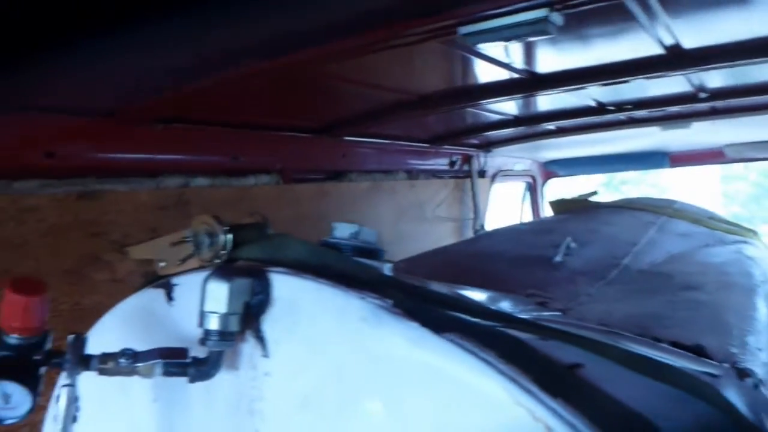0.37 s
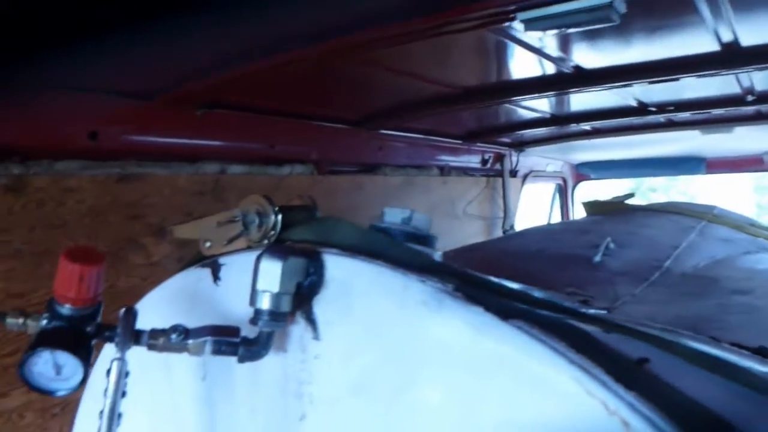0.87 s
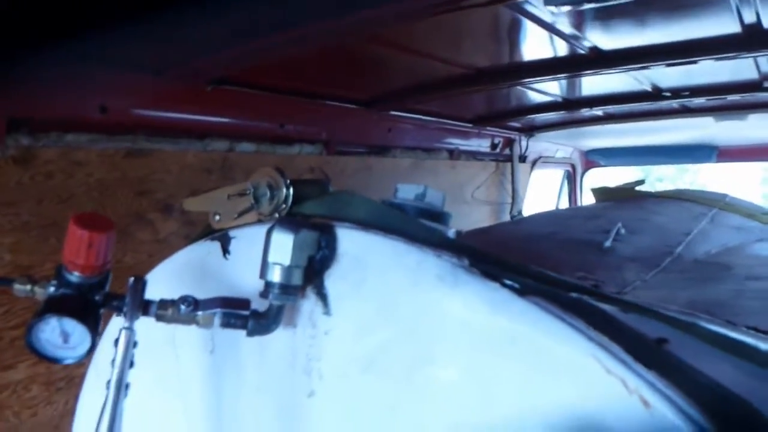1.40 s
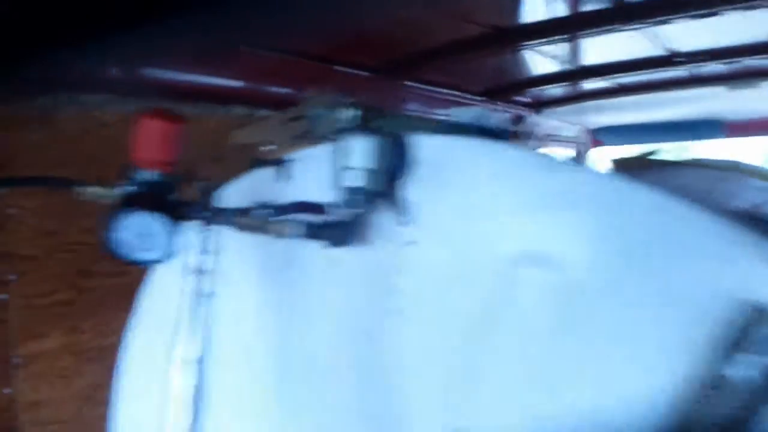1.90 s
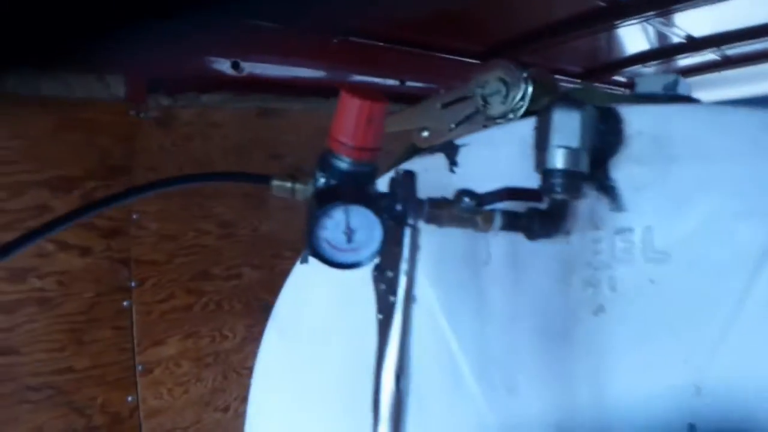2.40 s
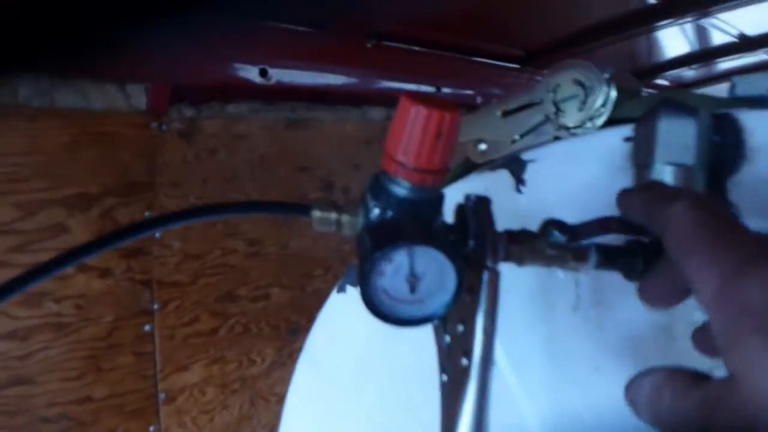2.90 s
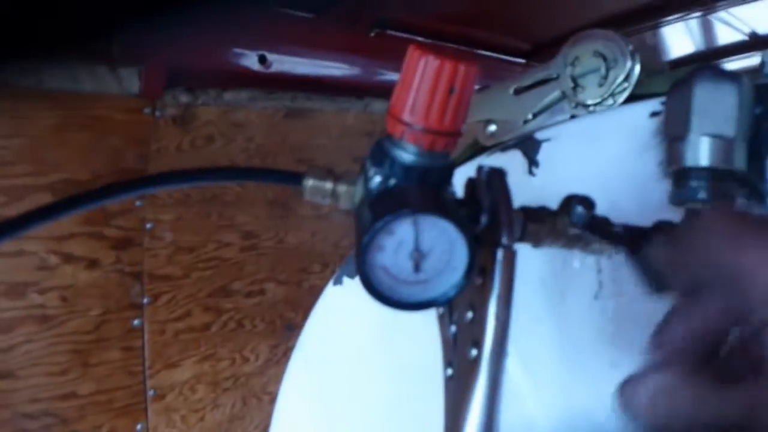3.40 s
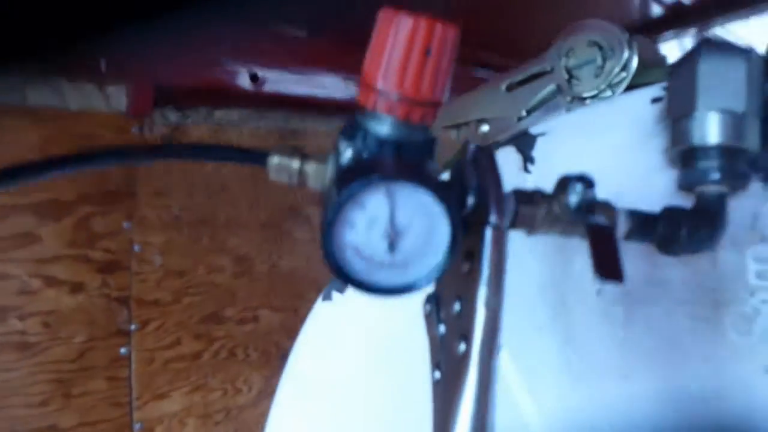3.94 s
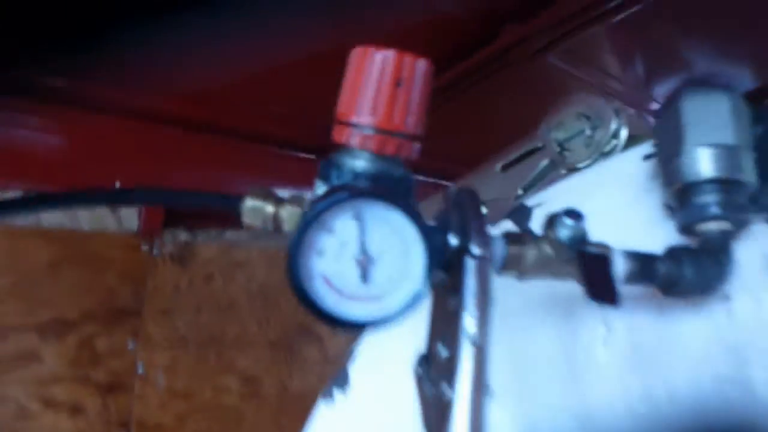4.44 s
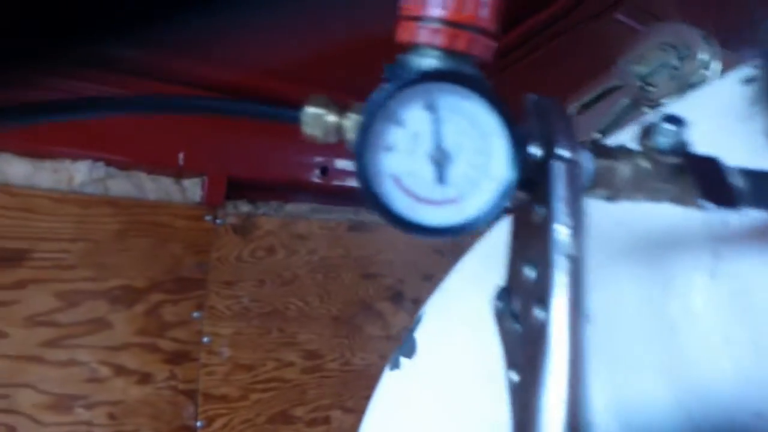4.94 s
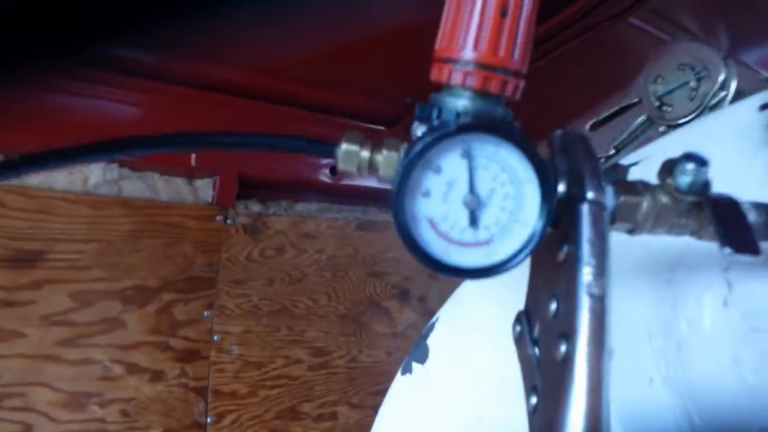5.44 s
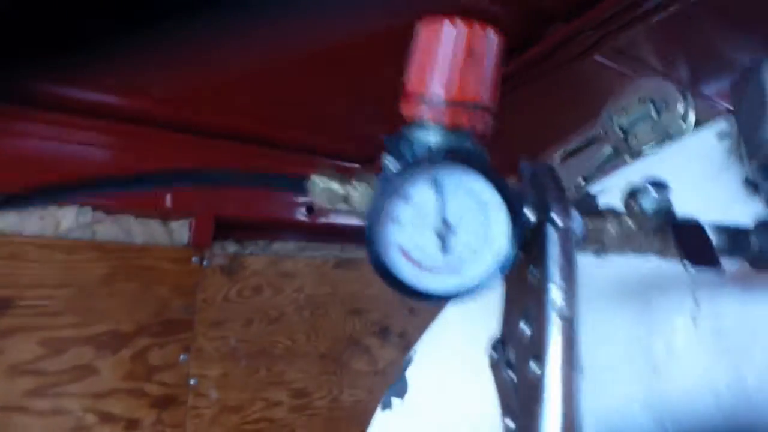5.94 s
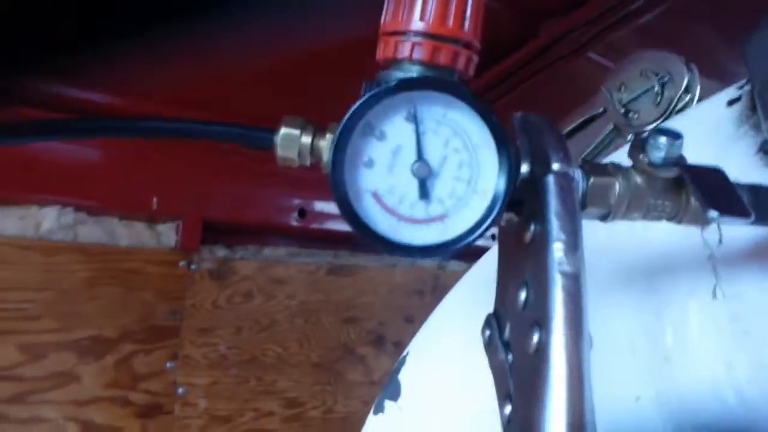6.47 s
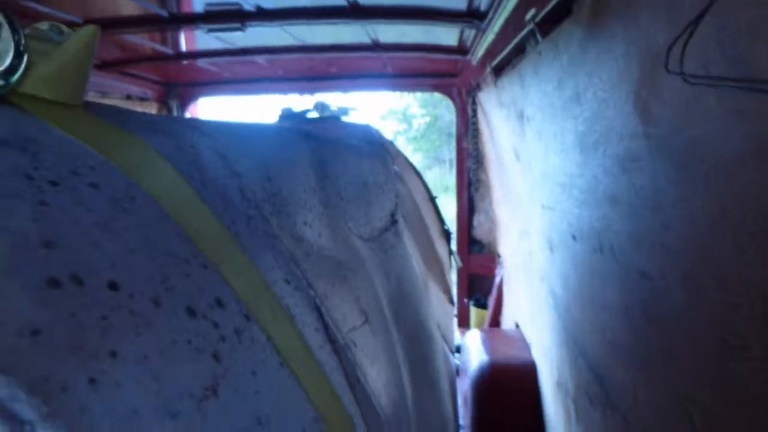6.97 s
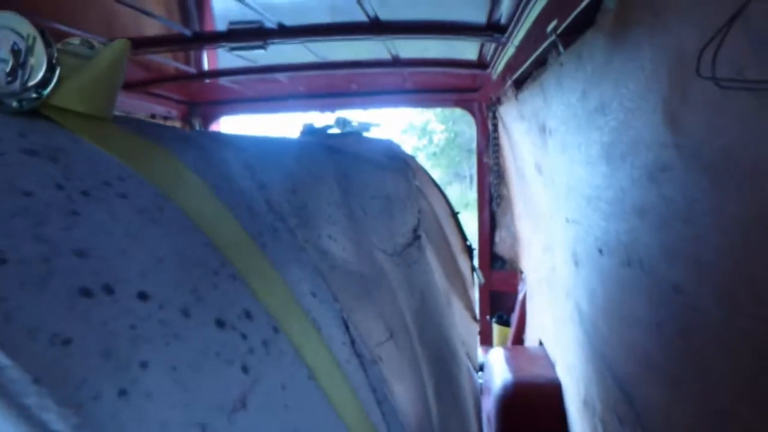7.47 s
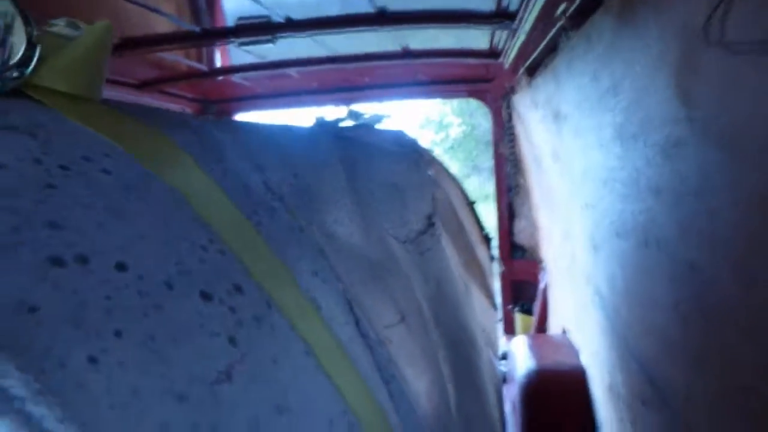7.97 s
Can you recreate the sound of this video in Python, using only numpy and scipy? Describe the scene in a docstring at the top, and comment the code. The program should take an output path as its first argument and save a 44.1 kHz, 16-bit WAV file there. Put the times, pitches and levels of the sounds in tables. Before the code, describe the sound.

Loud air flow hums inside a big metal tank, then drops to a sharp whistling leak; a dull knock rings, and after a brief gap something creaks twice.

```python
"""Compressed air hisses through a regulator and a ball valve into a large tank in the back of a van.
The valve shuts, the tank falls quiet and air escapes at the regulator with a brighter hiss; something knocks the tank.
After a short silent pause the same leak is heard from further off while a strap or panel creaks twice.
Flow sounds are flickering noise shaped by resonances and broad spectra; blows, slips and snaps ring damped modes."""
import sys
import numpy as np
from scipy import signal
from scipy.fft import irfft
from scipy.io import wavfile
from scipy.ndimage import uniform_filter1d, map_coordinates

SR = 44100
rng = np.random.default_rng(int(sys.argv[2]) if len(sys.argv) > 2 else 0)


def decibels_to_gain(level_db):
    """Convert a level in decibels to a linear amplitude gain (20 dB per decade)."""
    exponent = np.asarray(level_db, float) / 20
    return 10 ** exponent


def dump(signal):
    """Clip the signal to [-1, 1] and save it as 16-bit WAV at the path in sys.argv[1]."""
    limited = np.clip(np.atleast_2d(signal).T, -1, 1)
    pcm = np.round(limited * 32767).astype(np.int16)
    wavfile.write(sys.argv[1], SR, pcm)


N = 357210
T = np.arange(N) / SR
HZ = np.maximum(np.arange(N // 2 + 1) * SR / N, 1)

VALVE_SHUTS_S = 3.58
PAUSE_START_S, PAUSE_END_S = 6.598, 6.827   # silence between the near and the far listening place


def rms_one(x):
    """Normalisation: scales a signal to unit rms."""
    return x / np.sqrt(np.mean(x ** 2) + 1e-20)


def in_time(table):
    """Linear interpolation: reads a table of (t/s, value) at every sample."""
    seconds, values = np.transpose(table)
    return np.interp(T, seconds, values)


def at_hz(points, hz):
    """Logarithmic frequency axis: reads a spectrum table of (f/Hz, value) at given frequencies."""
    table_hz, values = np.transpose(points)
    return np.interp(np.log(hz), np.log(table_hz), values)


def drift(rate_hz):
    """Low-passed random process: two equal poles at rate_hz give a slow fluctuation of spread 1."""
    step = 40   # samples between computed points
    settle = 2000   # points dropped while the filter settles
    r = np.exp(-2 * np.pi * rate_hz * step / SR)
    noise = rng.standard_normal(N // step + settle + 2)
    slow = signal.lfilter([1], [1, -2 * r, r * r], noise)[settle:]
    return np.interp(np.arange(N) / step, np.arange(len(slow)), rms_one(slow))


def peaks(table):
    """Resonance: power response of modes driven by noise, each with its half-power width."""
    power = 0
    for hz, width_hz, level_db in table:
        detuning = (HZ ** 2 - hz ** 2) / (HZ * max(width_hz, 3))
        power = power + decibels_to_gain(2 * level_db) / (1 + detuning ** 2)
    return power


def broad(points):
    """Broadband spectral density: a power spectrum that dies away beyond the table's ends."""
    return decibels_to_gain(2 * at_hz([(1, -120)] + list(points) + [(SR, -60)], HZ))


# Correlation of the two channels: f/Hz, left-right likeness (0-1)
CHANNEL_LIKENESS = [(60, 0.4), (180, 0.82), (540, 0.87), (1610, 0.86), (4800, 1), (14400, 0.94)]
# Channel balance: f/Hz, left over right level/dB
CHANNEL_BALANCE = [(60, -3), (240, -3.5), (930, 0), (3650, 1), (14400, -0.5)]


def turbulence(power, low_hz, high_hz, flicker_db):
    """Turbulent flow noise: random spectrum of given power, partly coherent in stereo, of fluctuating level."""
    shape = (2, len(HZ))
    mid, side = np.sqrt(power) * (rng.standard_normal(shape) + 1j * rng.standard_normal(shape))
    alike = np.clip(at_hz(CHANNEL_LIKENESS, HZ), 0, 1)
    left = decibels_to_gain(at_hz(CHANNEL_BALANCE, HZ) / 2)
    mid = np.sqrt(1 + alike) * mid
    side = np.sqrt(1 - alike) * side
    # level is set by the mid signal between the two frequencies, before the flicker
    band = (HZ > low_hz) & (HZ < high_hz)
    scale = N / np.sqrt(2 * np.sum(np.abs(mid[band]) ** 2))
    both = irfft(np.array([(mid + side) * left, (mid - side) / left]), N) * scale
    return both * decibels_to_gain(flicker_db * (drift(5) / 3 + drift(34)))


def ring(events, modes, spread_db):
    """Modal impulse response: each blow excites every damped mode with a random strength of its own."""
    out = np.zeros(N)
    seconds, event_db = np.transpose(events)
    at = (seconds * SR).astype(int)
    luck = rng.standard_normal((len(at), len(modes)))
    for k, (hz, level_db, t60_s) in enumerate(modes):
        clicks = np.full(N, 1e-18)
        clicks[at] = decibels_to_gain(event_db + level_db + spread_db * luck[:, k])
        r = decibels_to_gain(-60 / (max(t60_s, .002) * SR))
        w = 2 * np.pi * hz / SR
        sense = (-1) ** k   # neighbouring modes swing in opposite sense
        out += sense * signal.lfilter([0, np.sin(w)], [1, -2 * r * np.cos(w), r * r], clicks)
    return out


def stroke(start, attack, hold, release, db):
    """Envelope of friction (times in s): a gain that swells, holds and dies away on squared ramps."""
    up = (T - start) / max(attack, .002)
    down = (start + attack + hold + release - T) / max(release, .002)
    return decibels_to_gain(db) * np.clip(np.minimum(up, down), 0, 1) ** 2


def delayed(x, ms):
    """Propagation delay: reads both channels a changing time late, between samples."""
    return np.array([map_coordinates(side, [np.arange(N) - ms * SR / 1000], order=3) for side in x])


# Air resonances of the tank: f/Hz, width/Hz, level/dB
TANK_AIR_MODES = [(304.8, 7.2, -6.5), (645.6, 13, -7), (666, 9.1, -11), (794, 15, -8.5), (876, 17, -6),
                  (938, 17.5, -1), (988.3, 15, 3), (1043, 16, -7), (1075, 15.4, -1), (1090, 13, -4.5),
                  (1145, 16, -4.5), (1188, 16, -12), (1232.5, 17, 0.5), (1297, 14.4, -1), (1344, 12, -8.5),
                  (1445, 53, -14.5)]
# Broad rush under the tank resonances: f/Hz, level per Hz/dB
TANK_RUSH_SPECTRUM = [(25, -16), (60, -18.5), (130, -26), (200, -18.5), (500, -14.5), (900, -18),
                      (1500, -21.5), (2200, -31.5)]
# Resonances of valve and pipe: f/Hz, width/Hz, level/dB
PIPE_MODES = [(1942, 122, -12), (2332, 152, -9.5), (2885, 120, -15), (3780, 170, -12), (4077, 140, -3),
              (4810, 135, -5), (5253, 117, -4.5), (6195, 203, -0.5), (6810, 110, -5.5), (7460, 220, -2)]
# Treble of the jet into the tank: f/Hz, level per Hz/dB
INFLOW_JET_SPECTRUM = [(1500, -27), (3300, -7), (5500, -11.5), (8000, -2.5), (10000, -0.5), (12500, -2.5),
                       (14500, -2)]
DRONE_DB, DRONE_SAG_DB_PER_S = -34.5, 0.24   # level at the start and its fall
PIPE_OVER_DRONE_DB = 6.5
JET_OVER_DRONE_DB, JET_GAIN_DB_PER_S = -1.5, 1.22   # at the start, and its gain as the microphone nears
PIPE_FADE_S, TANK_FADE_S = 0.1, 0.078   # times to fall to 1/e: exponential, Gaussian


def inflow():
    """Jet noise and cavity resonance: air tears through valve and pipe and sets the tank air droning."""
    shut = np.maximum(T - VALVE_SHUTS_S, 0)
    opened = np.minimum(T, VALVE_SHUTS_S)
    tank_power = peaks(TANK_AIR_MODES) + broad(TANK_RUSH_SPECTRUM)
    tank = turbulence(tank_power, 800, 1400, flicker_db=0.56)
    pipe = decibels_to_gain(PIPE_OVER_DRONE_DB) * turbulence(peaks(PIPE_MODES), 3500, 8000, flicker_db=0.36)
    jet_gain = decibels_to_gain(JET_OVER_DRONE_DB + JET_GAIN_DB_PER_S * opened)
    jet = jet_gain * turbulence(broad(INFLOW_JET_SPECTRUM), 8400, 12950, flicker_db=0.47)
    tank_fade = np.exp(-(shut / TANK_FADE_S) ** 2)
    pipe_fade = np.exp(-shut / PIPE_FADE_S)
    return decibels_to_gain(DRONE_DB - DRONE_SAG_DB_PER_S * opened) * (tank * tank_fade + (pipe + jet) * pipe_fade)


def van(x):
    """Diffuse reverberation: dense echoes of the steel box decay exponentially, different on each side."""
    t60_s = 0.19
    t = T[:SR // 2]
    tails = rng.standard_normal((2, len(t))) * decibels_to_gain(-60 * t / t60_s) * (t > .003)
    tails = tails / np.sqrt(np.sum(tails ** 2) / 2)
    return signal.fftconvolve(x, tails, axes=1)[:, :N]


# Resonances at the mouth of the leak: f/Hz, width/Hz, level/dB
LEAK_MOUTH_MODES = [(9585, 520, 1.5), (10880, 400, -3.5), (12200, 340, -1), (14100, 310, 1)]
# Broad hiss of the leak: f/Hz, level per Hz/dB
LEAK_JET_SPECTRUM = [(3000, -13), (4400, -21.5), (5500, -14.5), (7500, -10.5), (8500, -12.5), (11500, -9),
                     (13200, -9), (14500, -4)]
# Whistle of the leak: f/Hz, width/Hz, level/dB
LEAK_WHISTLE_MODES = [(6820, 140, -4), (6800, 550, -23)]
# Cavity resonances of the leak: f/Hz, width/Hz, level/dB
LEAK_CAVITY_MODES = [(2318, 110, -2.5), (2400, 390, -2.5), (4120, 760, -10.5), (4860, 300, -10.5)]
# Rush in the van: f/Hz, level per Hz/dB
VAN_RUSH_SPECTRUM = [(25, -8), (60, -14.5), (100, -15), (140, -1.5), (200, -9.5), (300, -7), (500, -8),
                     (700, -7.5), (1000, -1), (1250, -5.5), (1600, -4), (2000, -8.5), (3000, -9)]
# Echo of the leak off the tank wall as the microphone moves: t/s, delay/ms
WALL_ECHO_DELAY = [(3.85, 1.024), (4.08, 1.072), (4.25, 1.18), (4.55, 1.242), (4.66, 1.228), (4.89, 1.288),
                   (5.13, 1.316), (5.42, 1.314), (5.62, 1.282), (5.85, 1.232), (5.97, 1.234), (6.29, 1.32),
                   (6.52, 1.348)]
WALL_ECHO_DB = -10.5
NEARER_ECHO_MS, NEARER_ECHO_DB = .255, -5   # a second face of the fittings: earlier and weaker by this
ECHO_FROM_HZ = 8800   # the small faces return only the shortest waves
LEAK_RISE_S = 0.034   # linear rise centred on the shutting of the valve
# Close by: settled jet level; the other levels are relative to the jet
LEAK_DB, WHISTLE_DB, CAVITY_DB, RUSH_DB = -28.5, -5.5, -10.5, -18
# The same from the far seat
FAR_LEAK_DB, FAR_WHISTLE_DB, FAR_CAVITY_DB, FAR_RUSH_DB = -33.5, -4, -9.5, -18
SURGE_DB, SURGE_S = 1.5, 0.68   # extra jet after the valve shuts, time to 1/e
RUSH_LINGERS_DB, RUSH_LINGERS_S = 7, 0.27   # extra rush after the valve shuts, time to 1/e
FLARE_AT_S, FLARE_HALF_WIDTH_S, FLARE_DB = 3.74, 0.072, 5.1   # whistle flares as pressure backs up


def leak():
    """Jet noise with edge reflections: a thin jet whistles from the regulator, doubled by nearby surfaces."""
    near = T < (PAUSE_START_S + PAUSE_END_S) / 2
    shut = np.maximum(T - VALVE_SHUTS_S, 0)
    jet_db = np.where(near, LEAK_DB + SURGE_DB * np.exp(-shut / SURGE_S), FAR_LEAK_DB)
    flare = FLARE_DB * np.exp(-((T - FLARE_AT_S) / FLARE_HALF_WIDTH_S) ** 2)
    whistle_db = np.where(near, WHISTLE_DB, FAR_WHISTLE_DB) + flare
    cavity_db = np.where(near, CAVITY_DB, FAR_CAVITY_DB)
    rush_db = np.where(near, RUSH_DB + RUSH_LINGERS_DB * np.exp(-shut / RUSH_LINGERS_S), FAR_RUSH_DB)
    jet_power = peaks(LEAK_MOUTH_MODES) + broad(LEAK_JET_SPECTRUM)
    jet = turbulence(jet_power, 8000, 13460, flicker_db=0.44)
    delay_ms = in_time(WALL_ECHO_DELAY)
    echoes = delayed(jet, delay_ms) + decibels_to_gain(NEARER_ECHO_DB) * delayed(jet, delay_ms - NEARER_ECHO_MS)
    echoes = signal.lfilter(*signal.butter(2, ECHO_FROM_HZ, "high", fs=SR), echoes)
    echoes = near * decibels_to_gain(WALL_ECHO_DB) * echoes
    whistle = decibels_to_gain(whistle_db) * turbulence(peaks(LEAK_WHISTLE_MODES), 6400, 6920, flicker_db=1.44)
    cavity = decibels_to_gain(cavity_db) * turbulence(peaks(LEAK_CAVITY_MODES), 1900, 3000, flicker_db=1.27)
    rush = decibels_to_gain(rush_db) * turbulence(broad(VAN_RUSH_SPECTRUM), 100, 1900, flicker_db=0.37)
    rise = np.clip((T - VALVE_SHUTS_S) / LEAK_RISE_S + .5, 0, 1)
    return rise * decibels_to_gain(jet_db) * (jet + echoes + whistle + cavity + rush)


# The blow on the tank: t/s, level/dB
TANK_BLOWS = [(4.565, -24)]
# Modes of the tank shell: f/Hz, level/dB, t60/s
TANK_SHELL_MODES = [(137, -19, 2.7), (197, -3.5, 1.4), (213, -15, 0.7), (243, -2, 3.4), (277, -8.5, 3.8),
                    (309, -8.5, 1.4), (326, -13, 1.2), (363, -8, 1.5), (434, -13, 0.95), (564, -16, 0.76),
                    (690, -10, 1.1), (696, -8.5, 1.04), (800, -14, 1.2)]
# Rumble of the struck tank: f/Hz, level per Hz/dB
BOOM_SPECTRUM = [(100, -19), (190, -4.5), (330, 1), (480, -13), (700, -15.5), (1000, -31)]
# Scuff leading into the blow: f/Hz, level per Hz/dB
SCUFF_SPECTRUM = [(250, -16), (520, -1.5), (800, -1), (1200, -1.5), (1700, -13), (3000, -11)]
BOOM_DB, BOOM_T60_S, BOOM_RISE_S = -31, 2.27, .012


def tank_knock():
    """Impact excitation: a scuff, then a soft blow that rings long low shell modes over a dying boom."""
    since = T - TANK_BLOWS[0][0]
    decay = decibels_to_gain(BOOM_DB - 60 * np.maximum(since, 0) / BOOM_T60_S)
    swell = np.clip(since / BOOM_RISE_S, 0, 1) * decay
    boom = swell * turbulence(broad(BOOM_SPECTRUM), 100, 1000, flicker_db=2.2)
    scuff_gain = stroke(start=4.43, attack=.09, hold=.1, release=.1, db=-38)
    scuff = scuff_gain * turbulence(broad(SCUFF_SPECTRUM), 250, 1700, flicker_db=3.0)
    return ring(TANK_BLOWS, TANK_SHELL_MODES, spread_db=1.35) + boom + scuff


# Low rumble at the far seat: f/Hz, level per Hz/dB
FAR_RUMBLE_SPECTRUM = [(25, -3), (60, -0.5), (135, -8.5), (250, -2), (430, -5.5), (800, -10), (1300, -15)]
# Narrow breathy tone: f/Hz, width/Hz, level/dB
FAR_TONE_MODE = [(1650, 98, 0)]
FAR_RUMBLE_DB = -46
FAR_TONE_START_S, FAR_TONE_DB = 7.89, -46.5


def far_seat():
    """Broadband and narrow-band noise: a low rumble fills the van, a breathy tone joins near the end."""
    rumble = turbulence(broad(FAR_RUMBLE_SPECTRUM), 60, 1300, flicker_db=1.1)
    rumble = decibels_to_gain(FAR_RUMBLE_DB) * (T > PAUSE_END_S) * rumble
    tone_rise = np.clip((T - FAR_TONE_START_S) / 0.019, 0, 1)
    tone = tone_rise * turbulence(peaks(FAR_TONE_MODE), 1400, 1900, flicker_db=3.5)
    return rumble + decibels_to_gain(FAR_TONE_DB) * tone


# Drag of each creak: start t/s, attack/s, hold/s, release/s, level/dB
CREAK_STROKES = [(7.239, 0.038, 0.093, 0.054, -31.5), (7.795, 0.032, 0.071, 0.068, -38.5)]
# Rumble of the drag: f/Hz, level per Hz/dB
DRAG_SPECTRUM = [(60, -56), (140, -0.5), (240, -3), (320, -3), (450, -9), (800, -9), (1200, -14.5),
                 (2000, -22.5)]
# Clear slips: t/s, tick level/dB before the contact softens it
SLIP_TICKS = [(7.174, -33), (7.197, -33), (7.221, -31.5), (7.236, -26), (7.272, -23), (7.292, -24),
              (7.306, -25), (7.318, -24), (7.331, -19.5), (7.348, -25), (7.374, -21), (7.542, -32),
              (7.841, -24), (7.862, -22), (7.887, -20.5), (7.915, -27)]
# Tick modes: f/Hz, level/dB, t60/s
TICK_MODES = [(760, -2, 0.0085), (1170, -5, 0.017), (1730, -9, 0.014)]
# Bright snaps: t/s, level/dB
SNAPS = [(7.176, -38), (7.333, -40), (7.375, -30.5), (7.542, -32), (7.864, -33), (7.891, -32.5)]
# Snap modes: f/Hz, level/dB, t60/s
SNAP_MODES = [(2500, -9, 0.0071), (3300, 4, 0.0083), (4140, 1, 0.0056), (4900, 5.5, .006)]
# Thump modes of the panel: f/Hz, level/dB, t60/s
PANEL_MODES = [(154, -8.5, 0.088), (175, -5, 0.11), (239, -1, 0.078), (318, -5, 0.043), (402, -6, .04)]
CONTACT_HZ = 2500   # softness of the rubbing contact
THUMP_OVER_DRAG_DB, THUMP_LEAST_DB = 5.0, -50   # slips thump as hard as the drag pushes, plus a floor
FIRST_THUMP_DB, FIRST_THUMP_AFTER_S = -32, 0.0141   # each creak opens with a thump


def creak():
    """Stick-slip friction: each slip ticks and thumps the panel, and the drag between slips rumbles."""
    push = sum(stroke(*row) for row in CREAK_STROKES)
    drag = push * turbulence(broad(DRAG_SPECTRUM), 100, 1200, flicker_db=2.5)
    ticks = ring(SLIP_TICKS, TICK_MODES, spread_db=3.5)
    ticks = signal.lfilter(*signal.butter(1, CONTACT_HZ, fs=SR), ticks)
    thumps = []
    for slip_s, _ in SLIP_TICKS:
        gain = push[int(slip_s * SR)] * decibels_to_gain(THUMP_OVER_DRAG_DB) + decibels_to_gain(THUMP_LEAST_DB)
        thumps.append((slip_s, 20 * np.log10(gain)))
    thumps += [(row[0] + FIRST_THUMP_AFTER_S, FIRST_THUMP_DB) for row in CREAK_STROKES]
    snaps = ring(SNAPS, SNAP_MODES, spread_db=3.0)
    return ticks + snaps + ring(thumps, PANEL_MODES, spread_db=3.0) + drag


# The camera turns: t/s, left over right level/dB
CAMERA_TURN = [(0, 0), (1.75, 0.2), (2.75, -0.6), (4.3, .2), (5.75, -0.5), (8.1, 0.8)]
VAN_DB = -6   # reverberation relative to the direct hiss


def scene():
    """Superposition: the hiss fills the van and shifts as the camera turns; blows come close and dry."""
    hiss = inflow() + leak() + far_seat()
    wet = (hiss + decibels_to_gain(VAN_DB) * van(hiss)) / np.sqrt(1 + decibels_to_gain(2 * VAN_DB))
    balance = decibels_to_gain(in_time(CAMERA_TURN) / 2 * np.array([[1], [-1]]))
    return wet * balance + tank_knock() + creak()


WEAK_DB, WEAK_TILT_DB = -39.5, 1.11   # bar against the whole sound; its rise per octave above 500 Hz
MUTE_DB = -22   # gain of bands under the bar


def mute_weak_bands(x):
    """Short-time spectral gating: narrow bands far under the whole sound are left nearly empty."""
    size = 1024
    frames = signal.stft(x, nperseg=size, noverlap=size // 2, window="cosine")[2]
    power = np.sum(np.abs(frames) ** 2, axis=0)
    # bins are judged in pairs, against the total averaged over nine frames
    bands = np.repeat(power[:-1].reshape(256, 2, -1).mean(axis=1), 2, axis=0)
    total = uniform_filter1d(power.sum(axis=0), size=9)
    octaves = np.log2(np.maximum(np.arange(size // 2) * SR / size / 500, 1))
    bar_db = WEAK_DB + WEAK_TILT_DB * octaves
    weak = bands < decibels_to_gain(2 * bar_db)[:, None] * total
    frames[:, :-1] *= np.where(weak, decibels_to_gain(MUTE_DB), 1)
    return signal.istft(frames, nperseg=size, noverlap=size // 2, window="cosine")[1][:, :N]


# Dips in the microphone housing: f/Hz, width/Hz, depth (0-1)
HOUSING_DIPS = [(3135, 280, 0.45), (3428, 270, 0.51), (4365, 250, 0.6), (2624, 170, 0.35)]
BASS_CUT_HZ, TREBLE_CUT_HZ = 100, 14440
EDGE_DB = -14.5   # level just inside the pause
EDGE_S = 0.017   # cosine time constant; silence is reached after pi/2 of it


def roll_off(x):
    """The treble ends steeply here."""
    return signal.sosfilt(signal.butter(12, 14970, fs=SR, output="sos"), x)


def record(dry):
    """Linear filtering and gating: housing dips, bass cut, muting, steep treble cut and a silent pause."""
    for hz, width_hz, depth in HOUSING_DIPS:
        resonance = signal.lfilter(*signal.iirpeak(hz, hz / width_hz, fs=SR), dry)
        dry = dry - np.clip(depth, 0, 1) * resonance
    dry = signal.sosfilt(signal.butter(2, BASS_CUT_HZ, "high", fs=SR, output="sos"), dry)
    dry = mute_weak_bands(dry)
    dry = signal.sosfilt(signal.ellip(16, .5, 80, TREBLE_CUT_HZ, fs=SR, output="sos"), dry)
    inside = np.minimum(T - PAUSE_START_S, PAUSE_END_S - T)   # s from the nearer edge of the pause
    edge = decibels_to_gain(EDGE_DB) * np.cos(np.clip(inside / EDGE_S, 0, np.pi / 2)) ** 2
    running = np.where(inside < 0, 1, edge)
    mix = dry * uniform_filter1d(running, size=45)
    return roll_off(mix)


dry = scene()
out = record(dry)
dump(out)
```